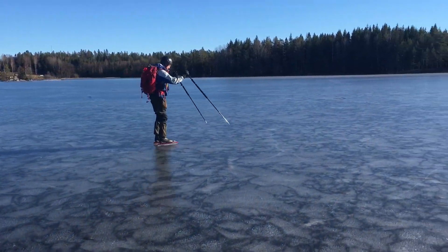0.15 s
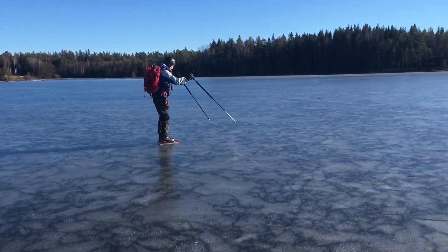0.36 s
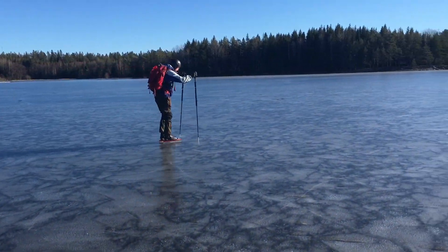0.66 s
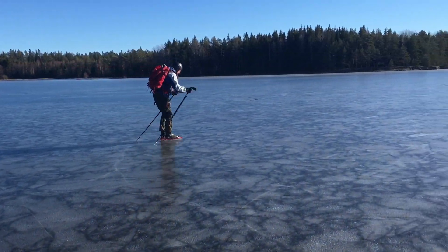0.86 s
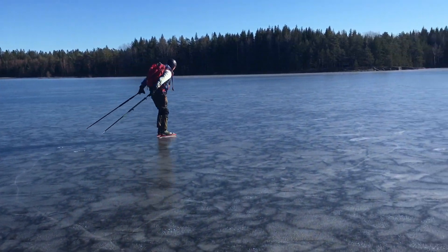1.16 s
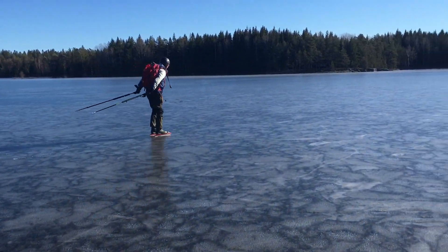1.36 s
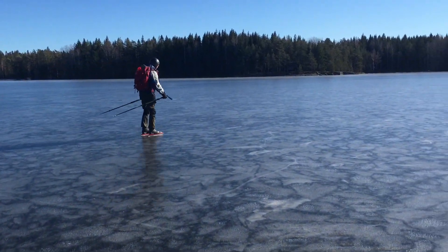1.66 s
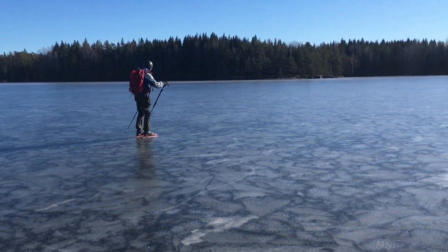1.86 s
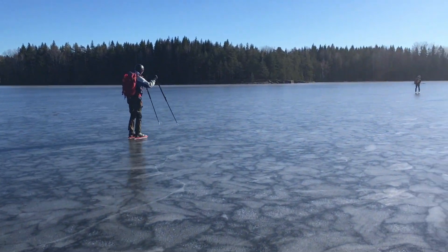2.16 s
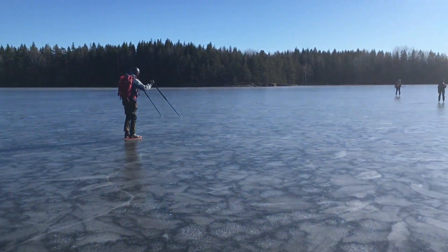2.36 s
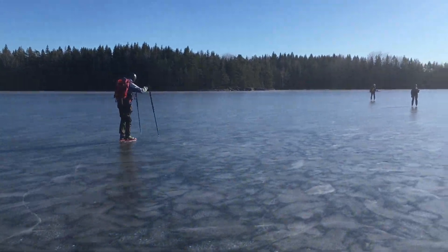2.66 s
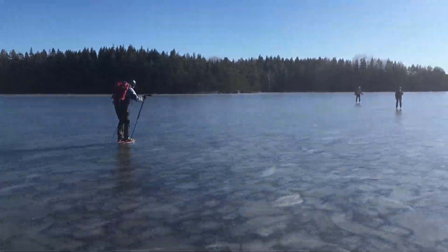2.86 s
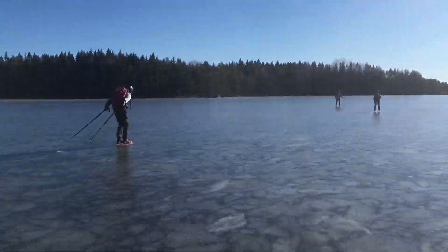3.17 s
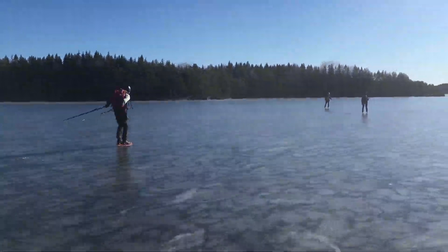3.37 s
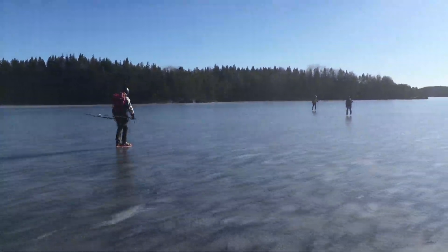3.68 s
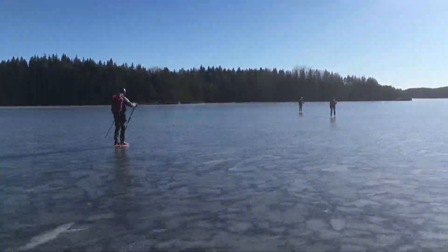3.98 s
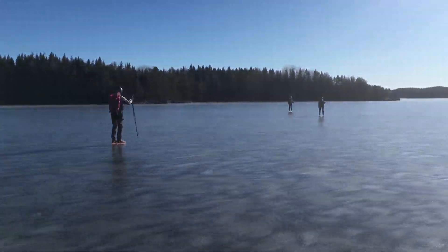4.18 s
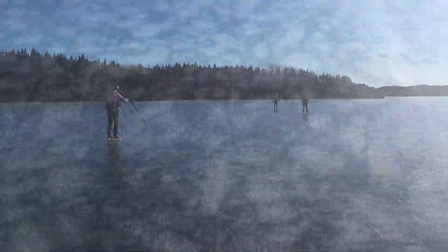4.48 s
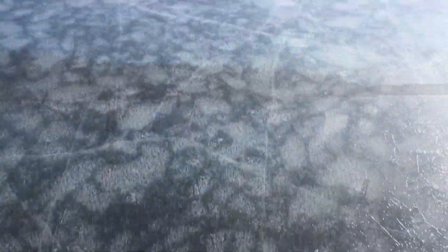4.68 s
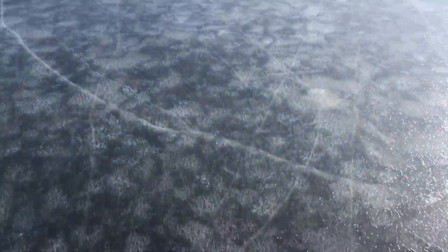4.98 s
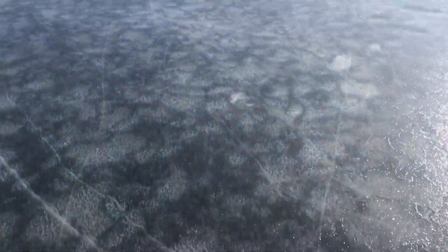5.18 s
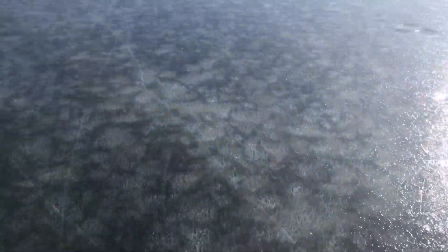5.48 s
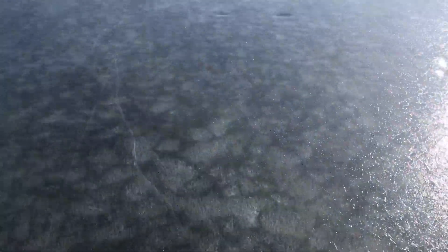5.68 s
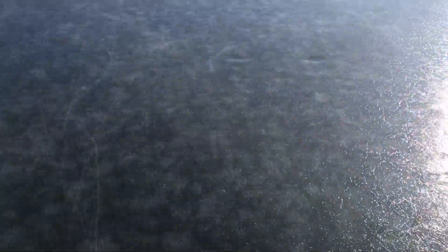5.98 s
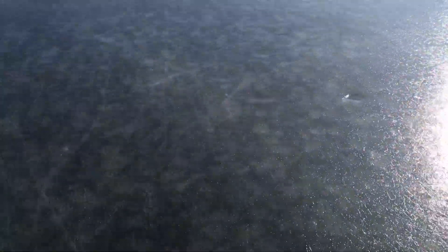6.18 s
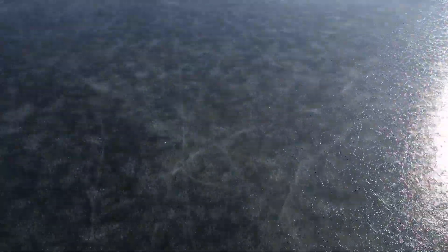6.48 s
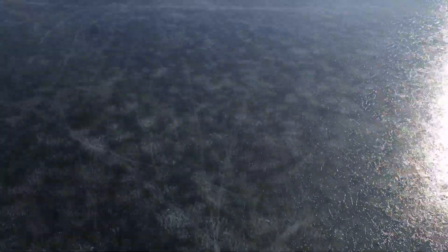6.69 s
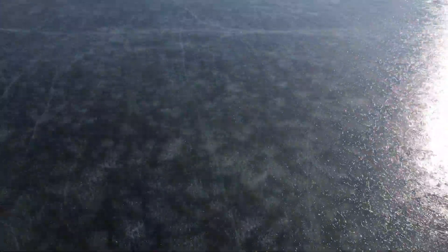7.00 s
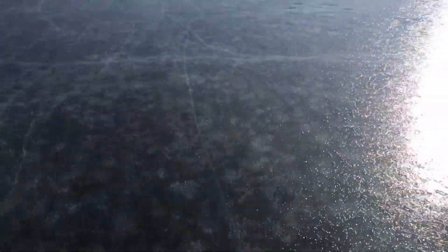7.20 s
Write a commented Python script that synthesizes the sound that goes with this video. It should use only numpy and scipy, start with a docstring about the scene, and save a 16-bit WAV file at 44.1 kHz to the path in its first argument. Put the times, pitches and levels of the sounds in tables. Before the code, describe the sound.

From 0 to about 4.4 s, long skate blades glide over rough lake ice beside the microphone. A soft, flickering hiss with fine crunching grains runs beneath dense, dull, irregular knocks, a stronger one near 1.8 s. The ice sheet answers with low thuds and brief hollow hums around 360 Hz, each sinking slightly, clustered around 1 to 2.2 s and 3 to 3.9 s. Thin, bright splintering ticks are scattered through, many near 0.8 to 1 s; an edge bites roughly at 2.55 s. Wind rumbles low, with buffets near 0.4, 1.5 and 2.8 s. Between 4.3 and 4.8 s the sound moves above the blades: hums stop, the scrape thins, and hard, close clacks burst out at 4.7 to 4.9 s. Uneven clacks and knocks continue, strong near 5.25, 6.1, 6.25 and 7 s, with sizzling crackles, until the gliding cuts off at 7.3 s.

```python
"""Skating on clear, pebbly lake ice

Long skate blades glide, heard first beside another skater, then from right above the blades.
Each bump knocks blade and ice sheet: noise contacts ring resonances, then bending waves bring the treble
first and the lows late. The sheet hums in short sinking tones at the pitch where it couples to the air.
Banded noise makes the edges hiss, ringing grains make them crunch; head wind rumbles on the microphone."""
import sys
import numpy as np
from scipy import signal
from scipy.fft import rfft, irfft
from scipy.io import wavfile

SR = 44100
rng = np.random.default_rng(int(sys.argv[2]) if len(sys.argv) > 2 else 0)


def log_audio(samples):
    """Write samples as a 16-bit WAV file to the path given in sys.argv[1]."""
    # one column per channel
    frames = np.atleast_2d(samples).T
    # limit to full scale, then quantise
    limited = np.clip(frames, -1, 1)
    pcm = np.round(limited * 32767).astype(np.int16)
    wavfile.write(sys.argv[1], SR, pcm)


N = 323694

# The glide. Each row: time in seconds, edge hiss level in dB (2-8 kHz, before flicker),
# rumble level in dB (before a 4 dB trim).
GLIDE = [(0, -58, -48), (.3, -58, -56), (.75, -55, -56.5), (1.35, -57, -55), (1.6, -56.5, -44),
         (1.95, -56.5, -61), (2.3, -60, -59), (2.44, -56.5, -62), (2.66, -58, -62), (2.85, -58, -48),
         (3.3, -57, -59), (3.7, -58.5, -46.5), (4.1, -58.5, -60), (4.45, -58.5, -68), (4.6, -63.5, -54.5),
         (5.6, -66.5, -63), (6.7, -68, -70), (7.05, -66.5, -57.5), (7.34, -67.5, -54)]
# Move from beside the skater to above the blades. Each row: time in seconds, share of the view above (0 to 1).
VIEW_TURN = [(4.3, 0), (4.8, 1)]
# Scrape colour beside the other skater. Each row: frequency in Hz, relative density in dB per Hz.
SCRAPE_BESIDE = [(70, -66), (110, -11), (290, -6.5), (360, -9), (466, -13.5), (1750, -13), (2920, -16),
                 (3940, -14.5), (4880, -20.5), (5600, -17.5), (6900, -17.5), (7800, -25.5), (9500, -23.5),
                 (10500, -31), (14800, -27.5), (16500, -46)]
# Scrape colour above the blades. Each row: frequency in Hz, relative density in dB per Hz.
SCRAPE_ABOVE = [(70, -57), (110, -4.5), (160, -3.5), (418, -10), (800, -15.5), (1570, -19), (2570, -12.5),
                (3120, -18.5), (4700, -23.5), (6700, -20.6), (7800, -27.5), (10300, -32), (12000, -27.5),
                (13900, -18), (15500, -38), (16500, -46)]
# Wind resonances, applied twice. Each row: frequency in Hz, width in Hz, level in dB per pass.
RUMBLE_MODES = [(42.2, 15.6, 7), (102.7, 55, 5.5)]
# Deep buffets of head wind. Each row: time in seconds, peak in dB.
BUFFETS = [(.149, -50), (.432, -43), (1.486, -48), (1.551, -40), (2.808, -36), (2.907, -42), (4.475, -47)]
# Timed swells of the ice hum. Each row: time in seconds, peak in dB.
HUM_SWELLS = [(0.024, -40.5), (0.071, -40), (0.482, -44), (0.895, -42.5), (0.926, -43), (1.018, -39),
              (1.071, -44), (1.138, -39.5), (1.191, -42), (1.408, -45), (1.592, -40), (1.686, -40),
              (1.731, -38), (1.808, -43), (1.891, -40.5), (1.919, -42.5), (1.958, -38), (2.2, -38),
              (2.232, -36), (2.418, -42), (3.009, -38.5), (3.214, -43), (3.342, -41.5), (3.368, -54),
              (3.4, -41), (3.497, -45), (3.551, -41.5), (3.626, -39), (3.754, -43), (3.86, -41),
              (4.261, -46), (4.343, -51), (4.469, -45)]
# Duller knocks from the other skater's blades. Each row: time in seconds, knock peak in dB before cuts,
# knock pitch in Hz, clack relative to the knock in dB.
FAR_KNOCKS = [(0.05, -30.5, 770, -7), (0.144, -33, 930, -8), (0.255, -36, 690, -19), (0.283, -34, 504, -20),
              (0.325, -34.5, 584, -3), (0.424, -31.5, 605, -19), (0.485, -33, 950, -19),
              (0.53, -31, 850, -10), (0.612, -38, 802, -6), (0.887, -34.5, 490, -16),
              (0.953, -33.5, 538, -16), (0.979, -41, 611, -21), (0.995, -28, 940, -17),
              (1.022, -35, 770, -7), (1.059, -30.5, 526, -14), (1.092, -39.5, 939, -11),
              (1.141, -32.5, 1280, -16), (1.194, -36, 613, -5), (1.415, -35, 930, -16),
              (1.447, -37, 586, -1.5), (1.587, -30.5, 567, -28), (1.692, -36, 1010, -8),
              (1.711, -31.5, 640, -15), (1.79, -36.5, 560, -14), (1.808, -21.5, 1160, -33),
              (1.894, -34.5, 460, -8), (2.004, -38.5, 804, -16), (2.042, -38.5, 1100, -18),
              (2.148, -29.5, 540, -5.5), (2.236, -32, 990, -22), (2.313, -35.5, 590, -20),
              (2.421, -37, 477, -13), (2.503, -26.5, 1280, -15), (2.759, -35.5, 556, -12),
              (2.834, -39, 953, -10), (2.964, -29, 526, -4.5), (3.024, -38, 1310, -3),
              (3.048, -34.5, 1420, -6.5), (3.092, -35, 795, 0), (3.223, -32.5, 760, -23),
              (3.35, -35.5, 458, 1), (3.405, -33.5, 730, -14), (3.433, -34, 498, -9),
              (3.452, -34.5, 890, -7), (3.479, -34.5, 1540, -5), (3.626, -36, 447, -24),
              (3.784, -40, 1090, -29), (3.869, -34.5, 940, 0.5), (4.093, -31, 684, 5),
              (4.198, -29, 775, -18), (4.274, -30, 980, -5), (4.449, -36.5, 930, -19),
              (4.467, -31, 597, 1.5)]
# The sheet flexes under a blade. Each row: time in seconds, peak in dB before cuts,
# nominal pitch in Hz (scaled by THUD_MODES).
THUDS = [(0.123, -36, 200), (0.249, -38, 322), (0.852, -41, 288), (0.949, -35.5, 237), (1.133, -38.5, 187),
         (1.187, -36.5, 310), (2.376, -36.5, 175), (2.414, -45, 248), (3.046, -31, 174), (3.109, -39, 207),
         (3.165, -37.5, 227), (3.32, -36.5, 199), (3.338, -39, 258), (3.365, -34, 236), (3.489, -37, 159),
         (3.545, -33, 222), (3.585, -43, 170), (3.695, -38, 210), (3.733, -35.5, 182), (3.782, -30.5, 239),
         (3.846, -38, 180), (3.87, -39, 128), (3.943, -50, 167), (4.059, -36, 236), (4.202, -45, 278),
         (4.222, -39, 170), (4.462, -30.5, 193)]
# Thin ticks of splintering ice. Each row: time in seconds, peak in dB, pitch in Hz.
TICKS = [(.153, -40, 7500), (.372, -48, 12500), (.389, -44, 13000), (.461, -54, 12500), (.742, -40, 14000),
         (.8048, -35, 13500), (.817, -44, 11400), (.8575, -38, 12500), (.950, -37, 13500),
         (.960, -47, 13500), (1.017, -43, 13500), (1.048, -46, 13000), (1.780, -43, 11000),
         (1.973, -40, 9000), (2.121, -40, 8300), (2.3005, -41, 9000), (2.555, -34.5, 7000),
         (3.273, -40, 9000), (3.343, -35, 8000), (3.482, -43, 12000), (3.598, -46, 12000),
         (3.992, -36, 11900), (4.011, -43, 12000), (4.113, -38, 11000), (4.22, -42, 10900)]
# Own blades over a bump. Each row: time in seconds, clack peak in dB, clack pitch in Hz, knock peak in dB,
# knock pitch in Hz, sizzle peak in dB, snap peak in dB, nominal contact in ms. Peaks are before cuts.
BUMPS = [(4.6765, -18, 2220, -25, 580, -30, -37, 0.42), (4.7112, -39, 2080.0, -39, 760.0, -56, -56, 2.3),
         (4.7445, -40, 2640, -42, 460.0, -50, -55, 0.82), (4.7717, -15, 2100, -25, 710, -38.5, -39, 1.07),
         (4.7961, -46, 1890.0, -39.5, 815, -56, -57, 2.0), (4.8254, -33, 2700, -32.5, 460.0, -42, -44, 1.2),
         (4.8492, -26.5, 2140, -34, 633, -39, -38, 0.37), (4.8628, -16.5, 2230, -23, 600, -32.5, -38, 0.32),
         (4.9049, -17.5, 2630, -20.5, 920, -31, -30, 1.36),
         (5.0272, -56, 2210.0, -38.5, 1010, -51, -58, 0.57),
         (5.0425, -35.5, 2240, -64, 910.0, -53, -56, 0.75),
         (5.1003, -38.5, 2650, -37, 460.0, -50, -51, 0.72),
         (5.109, -26.5, 2500, -26, 870, -43.5, -44, 1.05), (5.155, -37.5, 2240, -37, 1060, -43.5, -47, 2.8),
         (5.2108, -47, 1780.0, -37.5, 736, -57, -61, 1.3), (5.2351, -18.5, 2270, -21, 870, -34, -47, 1.23),
         (5.3044, -24, 2090, -27.5, 503, -41, -53, 2.05), (5.3617, -28.5, 1850, -28, 760, -32.5, -42, 1.13),
         (5.3906, -37, 2560, -32.5, 484, -47, -56, 1.44),
         (5.4362, -31, 1740, -27.5, 800, -39.5, -43.5, 1.78),
         (5.4843, -59, 1750.0, -38, 607, -54, -63, 1.96), (5.5173, -38, 1560, -33, 775, -42.5, -49, 1.65),
         (5.5368, -35, 2600, -33.5, 580, -54, -60, 1.7), (5.569, -38, 2740, -32.5, 1040, -53, -61, 0.47),
         (5.6572, -40, 2230, -42, 820.0, -54, -60, 0.88), (5.7105, -47, 2050.0, -38, 960, -51, -61, 1.25),
         (5.753, -42, 2550, -36, 556, -51, -53, 2.46), (5.7833, -37, 2430, -35, 750, -51, -55, 1.57),
         (5.8396, -43, 2550, -39, 775, -65, -58, 1.96), (5.8964, -44, 2660, -46, 960, -51, -55, 1.9),
         (5.9375, -32, 2460, -45, 460.0, -37.5, -34, 0.39), (5.9674, -33, 2470, -33, 585, -59, -52, 1.74),
         (5.9824, -54, 2270.0, -37, 660.0, -62, -60, 0.81),
         (6.0045, -36.5, 2100.0, -36.5, 470, -50, -50, 1.8), (6.0592, -34, 2570, -35, 1050, -41, -42, 1.3),
         (6.0709, -39, 2670.0, -34.5, 597, -56, -61, 2.3), (6.0878, -24.5, 2750, -22.5, 730, -40, -45, 2),
         (6.1429, -26, 2460, -27, 1040, -39, -44, 1.54), (6.237, -18.5, 2490, -22, 1220, -29, -50, 0.62),
         (6.2644, -36, 1780, -27.5, 935, -48, -51, 0.66), (6.2928, -38, 2660, -43, 460.0, -49, -57, 3.2),
         (6.3225, -38.5, 2030, -38.5, 730.0, -61, -63, 1.5),
         (6.374, -60, 1690.0, -38.5, 770, -57, -64, 1.63), (6.439, -39, 2380, -40, 725, -48, -47, 1.18),
         (6.4727, -23.5, 2270, -26.5, 920, -48, -54, 0.826), (6.525, -32.5, 2450, -25, 534, -50, -54, 2.2),
         (6.6028, -43, 2520, -40.5, 684, -62, -63, 1.67), (6.6608, -29, 2730, -29, 840, -42, -38, 0.55),
         (6.7073, -46, 2220.0, -40, 458, -55, -56, 0.74), (6.7229, -42, 2570.0, -38, 690.0, -59, -65, 1.1),
         (6.7615, -35, 2680, -30.5, 700.0, -53, -63, 1.34), (6.805, -30.5, 2520, -33, 764, -53, -58, 0.88),
         (6.8584, -31.5, 2750, -29.5, 600, -46.5, -47, 0.7), (6.8966, -40, 2700, -34.5, 880, -49, -46, 1.2),
         (6.9644, -59, 1860.0, -44, 570.0, -64, -63, 2.1),
         (6.9889, -24.5, 2580, -23, 1000, -35, -41.5, 1.24),
         (7.0311, -34, 2440.0, -30, 457, -58, -47, 1.96), (7.0568, -28.5, 2550, -24, 482, -38.5, -50, 1.14),
         (7.0817, -37, 2680.0, -38, 460.0, -55, -56, 0.63), (7.1095, -32, 2330, -31, 510, -45, -45, 1.04),
         (7.1326, -45, 2210.0, -44, 460.0, -48, -55, 1.3), (7.1705, -38, 2630, -34, 450, -60, -57, 2.54),
         (7.1863, -36, 2660, -39, 460.0, -56, -54, 0.75),
         (7.2624, -36.5, 2540, -38.5, 460.0, -59, -55, 1.8), (7.2851, -35, 2550, -28, 580, -56, -54, 1.8),
         (7.3047, -27, 2700, -27, 590, -50, -48, 1.8)]
# Clack resonances of the blade. Each row: multiple of the event pitch, width in Hz per pass, level in dB.
CLACK_MODES = [(1.0, 900, 0), (1.5, 500, -11)]
# Knock resonances of the bump. Each row: multiple of the event pitch, width in Hz per pass, level in dB.
KNOCK_MODES = [(0.998, 464, 4), (1.9, 467, -5)]
# Thud resonance of the sheet. Each row: multiple of the event pitch, width in Hz per pass, level in dB.
THUD_MODES = [(0.8, 215, 0)]
# Tick resonance. Each row: multiple of the event pitch, width in Hz per pass, level in dB.
TICK_MODES = [(1.0, 3600, 0)]
# Fixed sizzle resonances. Each row: frequency in Hz, width in Hz, level in dB before a random share.
SIZZLE_MODES = [(4910, 260, 13), (6720, 520, 21.5), (9260, 270, 1.3)]
# Fixed resonances of the top snap. Each row: frequency in Hz, width in Hz, level in dB before a random share.
SNAP_MODES = [(11140, 390, -0.24), (14100, 700, 0.24), (15700, 600, -2)]
# Resonances of a biting edge. Each row: frequency in Hz, width in Hz, relative level in dB.
BITE_MODES = [(2050, 290, 0.5), (4300, 640, -5.5), (6300, 1300, -8)]

ROW_SAMPLES = 2048   # length of one blow
ONSET_LEAD_MS = .55   # a contact begins this long, plus half its length, before its listed time
# bending waves: delay at 1 kHz, growing as 1 / sqrt(frequency)
SPREAD_MS_AT_1KHZ, FLEX_SPREAD_MS_AT_1KHZ, THUD_SPREAD_MS_AT_1KHZ = .4, 1.794, 2.547
# low wave with every knock: pitch, level at a usual knock, share of the knock's swing in dB
FLEX_HZ, FLEX_DB, FLEX_FOLLOWS, USUAL_KNOCK_DB = 144, -39, 0.59, -32
# ice grains crushed under the edges: median rate, level relative to the hiss, ring length setting
CRUNCH_PER_S, CRUNCH_DB, CRUNCH_CYCLES = 260, -5.5, 7.1
BUFFET_HZ, BUFFET_NOMINAL_MS = 53.4, 60.6
HUM_HZ, HUM_NOMINAL_MS = 362.8, 34
HUM_BED_DB, HUM_BED_WIDTH_HZ = -63, 70   # the glide keeps the sheet humming between swells; width per pass
BED_ENDS_S = 4.4   # end of the steady hum bed, and of the random faint swells and thuds
FAINT_HUM_DB, FAINT_THUD_DB, FAINT_SPREAD_DB = -49, -44, 4   # mid levels, full range
PEBBLES_BESIDE = .82   # share of the small bumps before BED_ENDS_S
PEBBLE_CLACK_DB, PEBBLE_KNOCK_DB, PEBBLE_SIZZLE_DB = -54.5, -50.5, -77.5   # mid levels
PEBBLE_SPREAD_DB = 22.5   # full range
BITE_S, BITE_LENGTH_S, BITE_DB = 2.556, 0.16, -53   # middle, width at 1/e, median level at the middle


def from_db(db):
    """dB to gain."""
    return 10 ** (np.asarray(db) / 20)


def rms_one(x):
    """Scale to rms 1."""
    return x / np.sqrt(np.mean(x ** 2) + 1e-20)


def in_time(rows):
    """Columns of a table as curves at the sample rate."""
    s, *columns = np.transpose(rows)
    return [np.interp(np.arange(N) / SR, s, column) for column in columns]


def at_hz(points, hz):
    """Read a spectrum on a log-frequency axis."""
    point_hz, level_db = np.transpose(points)
    return np.interp(np.log(hz), np.log(point_hz), level_db)


def drift(rate_hz):
    """Slow random curve of rms 1: low-passed noise, made at 1/40 of the sample rate."""
    step = 40
    r = np.exp(-2 * np.pi * step * rate_hz / SR)
    noise = rng.standard_normal(N // step + 2002)
    slow = signal.lfilter([1], [1, -2 * r, r * r], noise)[2000:]   # drop the filter's start
    return np.interp(np.arange(N) / step, np.arange(len(slow)), rms_one(slow))


def cut(x, hz, kind):
    """Second-order Butterworth low-pass, high-pass or band-pass."""
    return signal.sosfilt(signal.butter(2, hz, kind, fs=SR, output="sos"), x)


def resonate(x, modes):
    """Parallel resonances with alternating signs."""
    out = 0
    for k, (hz, width_hz, level_db) in enumerate(modes):
        r = np.exp(-np.pi * width_hz / SR)
        b = (1 - r * r) / 2 * np.array([1, 0, -1])
        a = [1, -2 * r * np.cos(2 * np.pi * hz / SR), r * r]
        out = out + (-1) ** k * from_db(level_db) * signal.lfilter(b, a, x)
    return out


def ring_pitched(grit, modes, hz):
    """Each resonance acts twice, so that the gaps between them stay dark."""
    out = 0
    for ratio, width_hz, level_db in modes:
        mode = [(ratio * hz, width_hz, 0)]
        out = out + from_db(level_db) * resonate(resonate(grit, mode), mode)
    return out


def blows(times_s, peak_db, contact_ms, modes, pitch_hz=None, tail_db=-13.0, tail_ms=4.5,
          spread_ms=SPREAD_MS_AT_1KHZ, clean=0):
    """Gritty contacts ring the modes, spread out by the ice sheet; each is set to its peak."""
    count = len(times_s)
    ms = np.arange(ROW_SAMPLES) / SR * 1000
    span_ms = np.clip(contact_ms, .08, 8)[:, None]
    # ragged tail: the level varies at random in short steps
    ragged = from_db(4 * np.repeat(rng.standard_normal((count, 32)), ROW_SAMPLES // 32, axis=1))
    after_ms = ms - 1.5 * span_ms   # the force swells to its height and fades
    touch = np.exp(-(after_ms / span_ms) ** 2)
    tail = np.where(after_ms < 0, touch, np.exp(-np.abs(after_ms) / tail_ms)) * ragged
    shape = touch + from_db(tail_db) * tail
    grit = shape * rng.standard_normal((count, ROW_SAMPLES))
    # clean impulse at the height of the contact, relative to the root of the grit's energy
    grit[np.arange(count), touch.argmax(axis=1)] += clean * np.sqrt((shape ** 2).sum(axis=1))
    if pitch_hz is None:
        # every blow shares its force among the modes anew
        share = from_db(4 * rng.standard_normal((count, len(modes))))
        rows = sum((-1) ** k * share[:, [k]] * resonate(grit, [mode]) for k, mode in enumerate(modes))
    else:
        rows = np.array([ring_pitched(g, modes, hz) for g, hz in zip(grit, pitch_hz)])
    # phase whose group delay is spread_ms / sqrt(kHz)
    khz = np.fft.rfftfreq(ROW_SAMPLES, 1000 / SR)
    rows = irfft(rfft(rows) * np.exp(-4j * np.pi * spread_ms * np.sqrt(khz)), ROW_SAMPLES)
    rows *= (from_db(peak_db) / np.abs(rows).max(axis=1))[:, None]
    rows *= np.hanning(2 * ROW_SAMPLES)[ROW_SAMPLES:]   # fade out
    out = np.zeros(N + ROW_SAMPLES)
    for s, row, length_ms in zip(times_s, rows, span_ms[:, 0]):
        at = max(round(s * SR - (ONSET_LEAD_MS + length_ms / 2) * SR / 1000), 0)
        out[at:at + ROW_SAMPLES] += row
    return out[:N]


def swells(rows, hz, length_ms, stray, droop):
    """Short tones that swell and fade, each a little off pitch and sinking."""
    out, draw = np.zeros(N), rng.random((len(rows), 3))
    for (s, peak_db), (detune, stretch, turn) in zip(rows, draw):
        n = int(length_ms * (0.781 + .5 * stretch) * SR / 1000)
        pitch_hz = hz * (1 + stray * (2 * detune - 1)) * np.linspace(1 + droop, 1 - droop, n)
        tone = np.sin(2 * np.pi * (np.cumsum(pitch_hz) / SR + turn))
        tone *= from_db(peak_db) * np.hanning(n)
        at = round(s * SR) - n // 2 + np.arange(n)
        inside = (at >= 0) & (at < N)
        out[at[inside]] += tone[inside]
    return out


def scrape(hiss_db, patchy_db=1.12, grit_db=2.47, low_lumps_db=4.0, gaps_db=1.5):
    """Fifth-octave noise bands; gritty ice makes neighbours flicker together; dark gaps above the blades."""
    above, = in_time(VIEW_TURN)
    grit = [drift(70), drift(70), drift(70)]
    edges_hz = 80 * 2 ** np.arange(0, 7.9, 1 / 5)
    white = rng.standard_normal((2, N))
    # both colours are referred to their power in 2-8 kHz
    treble_hz = np.geomspace(2000, 8000, 40)
    beside_ref_db, above_ref_db = [10 * np.log10(np.trapz(from_db(2 * at_hz(points, treble_hz)), treble_hz))
                                   for points in (SCRAPE_BESIDE, SCRAPE_ABOVE)]
    out = 0
    for k, (low, high) in enumerate(zip(edges_hz, edges_hz[1:])):
        band = cut(white[k % 2], [low, high], "band")
        hz = np.sqrt(low * high)
        beside_db = at_hz(SCRAPE_BESIDE, hz) - beside_ref_db
        above_db = at_hz(SCRAPE_ABOVE, hz) - above_ref_db
        colour_db = (1 - above) * beside_db + above * above_db
        # nearby bands share their flicker
        place = k / len(edges_hz) * 2
        angle = place % 1 * np.pi / 2
        near = np.cos(angle) * grit[int(place)] + np.sin(angle) * grit[int(place) + 1]
        lumpy_db = patchy_db + low_lumps_db * (hz < 520)   # the low end comes in lumps
        lumps_db = lumpy_db * drift(15.6) - lumpy_db ** 2 / 37.0   # lowered to offset the gain of the lumps
        out = out + band * from_db(colour_db + grit_db * near + lumps_db)
    return np.sqrt(SR / 2) * out * from_db(hiss_db + gaps_db * above * drift(12.5))


def crunch(hiss_db):
    """Clumps of uneven ice grains, each ringing a few cycles at its own pitch."""
    sizes = from_db(5.0 * np.minimum(rng.exponential(1, N), 4)) * rng.choice([-1, 1], N)
    born = rng.random(N) < CRUNCH_PER_S * from_db(6.0 * drift(7)) / SR
    pitches_hz = np.geomspace(480, 2800, 14)
    dealt = rng.integers(0, 14, N)
    rings = 0
    for k, hz in enumerate(pitches_hz):
        grains = sizes * born * (dealt == k) + 1e-18
        rings = rings + resonate(grains, [(hz, 2.1 * hz / CRUNCH_CYCLES, 0)])
    return from_db(hiss_db + CRUNCH_DB) * rms_one(cut(rings, 3700, "low"))


def wind(rumble_db):
    """Lumpy low noise on the microphone, with single deep buffets."""
    gusts = rng.standard_normal(N) * from_db(5.6 * drift(13))
    rumble = rms_one(resonate(resonate(gusts, RUMBLE_MODES), RUMBLE_MODES))
    buffets = swells(BUFFETS, BUFFET_HZ, BUFFET_NOMINAL_MS, stray=0.55, droop=0.43)
    return from_db(rumble_db - 4.0) * rumble + buffets


def hum(count):
    """Pushes ring the ice sheet at its air-coupling pitch, over a narrow noise bed."""
    when, size = rng.random((count, 2)).T
    faint = np.column_stack([BED_ENDS_S * when, FAINT_HUM_DB + FAINT_SPREAD_DB * (size - .5)])
    mode = [(HUM_HZ, HUM_BED_WIDTH_HZ, 0)]
    bed = rms_one(resonate(resonate(rng.standard_normal(N), mode), mode))
    bed = bed * from_db(HUM_BED_DB + 4.5 * drift(16))
    fade = np.clip(BED_ENDS_S - np.arange(N) / SR, 0, 1)   # over the bed's last second
    rows = np.vstack([HUM_SWELLS, faint])
    return fade * bed + swells(rows, HUM_HZ, HUM_NOMINAL_MS, stray=0.069, droop=0.14)


def bumps(rows):
    """One contact sets off a clack, a knock, a shorter sizzle, a snap at the top and a late low wave."""
    s, clack_db, clack_hz, knock_db, knock_hz, sizzle_db, snap_db, contact_ms = np.transpose(rows)
    clack = blows(s, clack_db, contact_ms, CLACK_MODES, clack_hz, tail_db=-8.5, tail_ms=4.3, clean=0.72)
    clack = cut(cut(clack, 3130, "low"), 330, "high")
    knock = blows(s, knock_db, 1.1 * contact_ms, KNOCK_MODES, knock_hz,
                  tail_db=-14.5, tail_ms=6.4, clean=0.74)
    knock = cut(knock, 1300, "low")
    sizzle = blows(s, sizzle_db, 0.92 * contact_ms, SIZZLE_MODES, tail_db=-11.0, tail_ms=3.0)
    sizzle = cut(sizzle, 2100, "high")
    snap = blows(s, snap_db, 0.59 * contact_ms, SNAP_MODES, tail_db=-12.0, tail_ms=5.0)
    snap = cut(snap, 9100, "high")
    flex_db = FLEX_DB + FLEX_FOLLOWS * (knock_db - USUAL_KNOCK_DB)
    flex_modes = [(FLEX_HZ, 110, 0), (2.81 * FLEX_HZ, 200, -5)]
    flex = blows(s, flex_db, 0.96 * contact_ms, flex_modes, tail_db=-27.0, tail_ms=2.6,
                 spread_ms=FLEX_SPREAD_MS_AT_1KHZ, clean=2.2)
    return clack + knock + sizzle + snap + cut(flex, 1100, "low")


def pebbles(count):
    """Small bumps at random moments."""
    draw = rng.random((count, 7))
    s = np.interp(draw[:, 0], [0, PEBBLES_BESIDE, 1], [0, BED_ENDS_S, (N - 1) / SR])
    middles_db = np.array([PEBBLE_CLACK_DB, PEBBLE_KNOCK_DB, PEBBLE_SIZZLE_DB])
    clack_db, knock_db, sizzle_db = (middles_db + PEBBLE_SPREAD_DB * (draw[:, 1:4] - .5)).T
    clack_hz = 1700 + 1100 * draw[:, 4]
    knock_hz = 480 + 700 * draw[:, 5]
    contact_ms = 0.31 + 1.2 * draw[:, 6]
    snap_db = sizzle_db
    return bumps(np.column_stack([s, clack_db, clack_hz, knock_db, knock_hz, sizzle_db, snap_db, contact_ms]))


def far_knocks():
    """The other skater's bumps: distance dulls the sizzle and lowers the clack."""
    s, knock_db, knock_hz, clack_rel_db = np.transpose(FAR_KNOCKS)
    clack_db = knock_db + clack_rel_db
    clack_hz, contact_ms = np.full(len(s), 1900), np.full(len(s), 0.728)
    return bumps(np.column_stack([s, clack_db, clack_hz, knock_db, knock_hz,
                                  clack_db - 11.0, clack_db - 15.0, contact_ms]))


def thuds(count):
    """The flexing sheet gives dull low pushes of a cycle or two."""
    when, size, pitch = rng.random((count, 3)).T
    faint_db = FAINT_THUD_DB + FAINT_SPREAD_DB * (size - .5)
    faint = np.column_stack([BED_ENDS_S * when, faint_db, 140 + 170 * pitch])
    s, peak_db, pitch_hz = np.vstack([THUDS, faint]).T
    pushes = blows(s, peak_db, np.full(len(s), 1.5), THUD_MODES, pitch_hz, tail_db=-60,
                   spread_ms=THUD_SPREAD_MS_AT_1KHZ, clean=5.3)
    return cut(pushes, 1400, "low")


def ticks():
    """Splintering ice: brief bright snaps, each at its own pitch, without bending-wave spread."""
    s, peak_db, pitch_hz = np.transpose(TICKS)
    return blows(s, peak_db, np.full(len(s), .4), TICK_MODES, pitch_hz,
                 tail_db=-30.0, tail_ms=3.0, spread_ms=0, clean=1)


def bite():
    """One edge bites for a moment: a swell of rough noise in the blade's resonances."""
    swell = np.exp(-(2 * (np.arange(N) / SR - BITE_S) / BITE_LENGTH_S) ** 2)
    rough = rms_one(resonate(rng.standard_normal(N), BITE_MODES))
    return swell * from_db(BITE_DB + 2 * drift(60)) * rough


def scene():
    """All sources, one channel."""
    hiss_db, rumble_db = in_time(GLIDE)
    glide = scrape(hiss_db) + crunch(hiss_db) + wind(rumble_db)
    sheet = hum(count=30) + thuds(count=30)
    contacts = pebbles(count=220) + far_knocks() + ticks() + bite() + bumps(BUMPS)
    return (glide + sheet + contacts)[None]


def record(dry):
    """The microphone loses the deepest bass; the top is cut, 60 dB down from 16.6 kHz."""
    no_deep_bass = cut(dry, 38, "high")
    return signal.sosfilt(signal.cheby2(12, 60, 16600, fs=SR, output="sos"), no_deep_bass)


dry = scene()
out = record(dry)
log_audio(out)
```